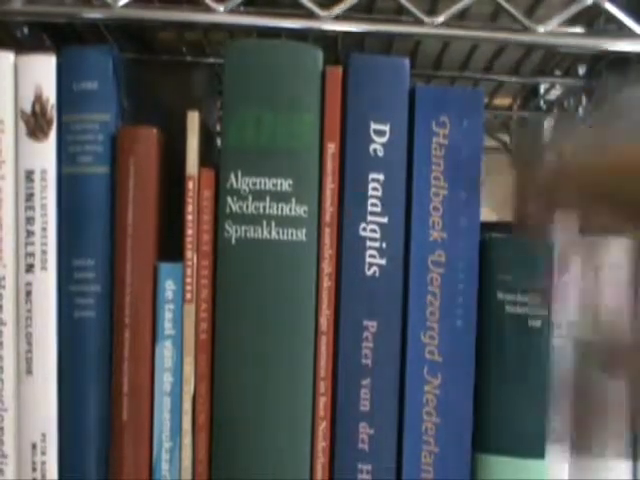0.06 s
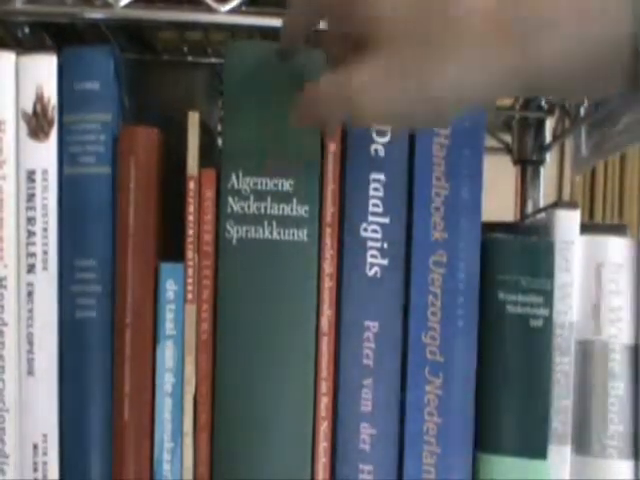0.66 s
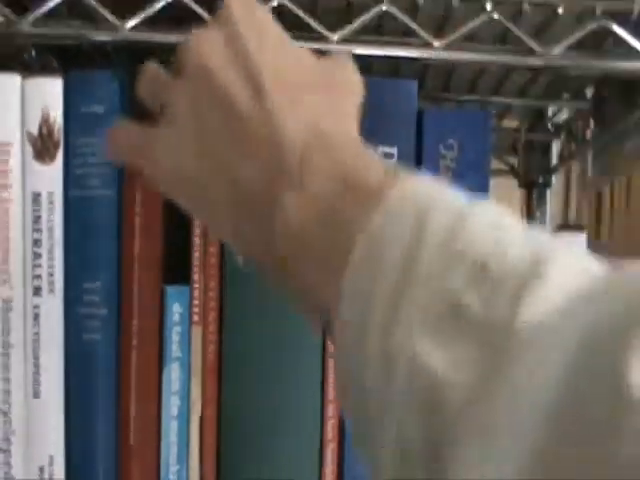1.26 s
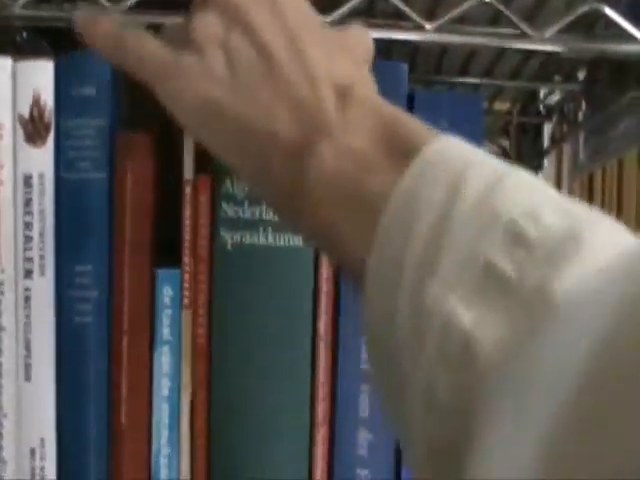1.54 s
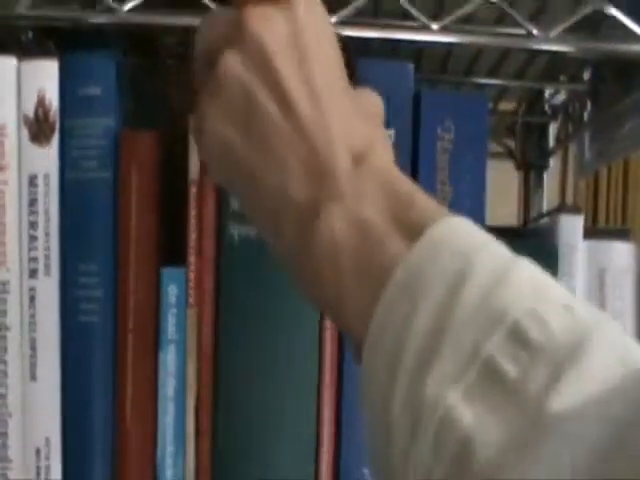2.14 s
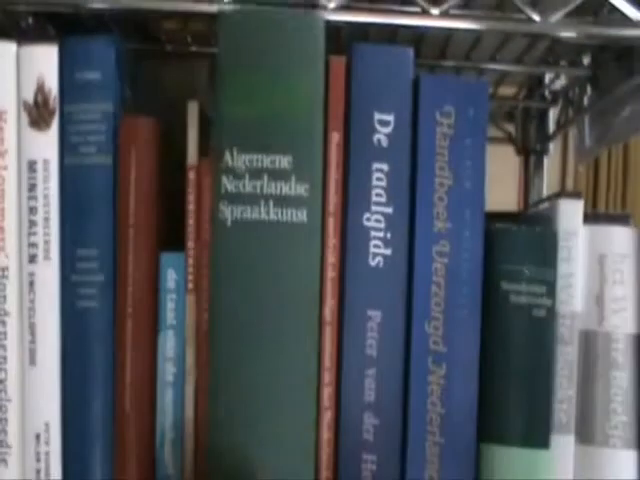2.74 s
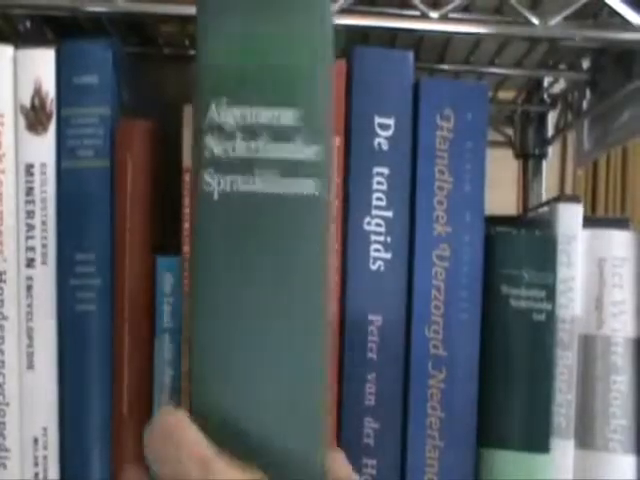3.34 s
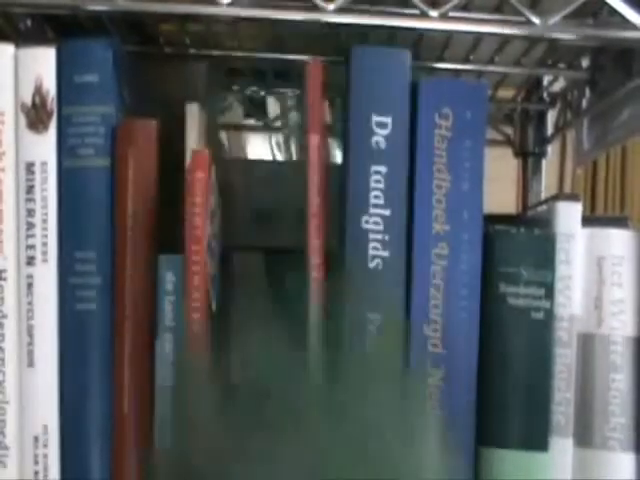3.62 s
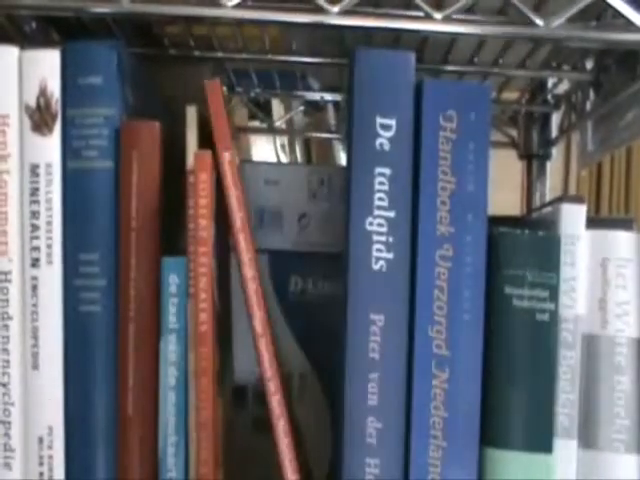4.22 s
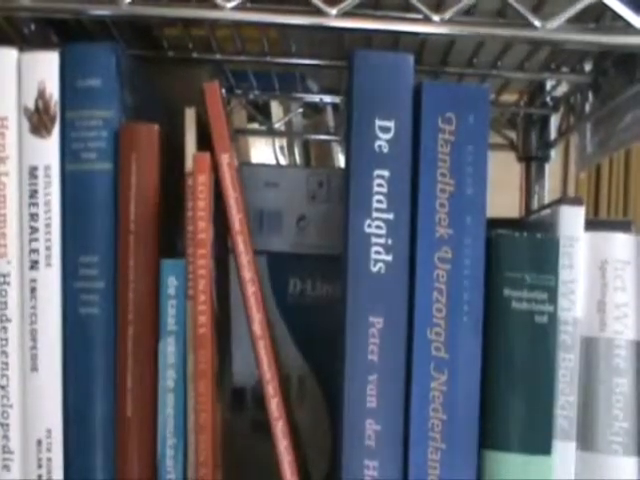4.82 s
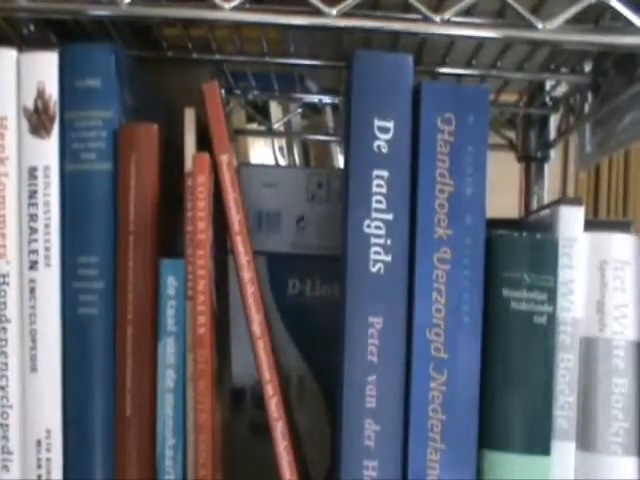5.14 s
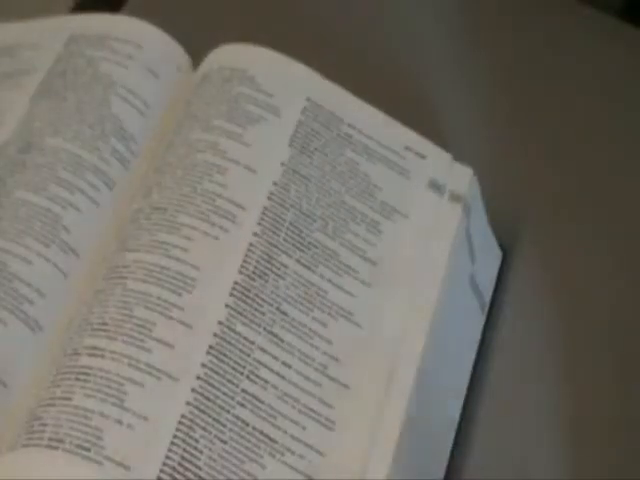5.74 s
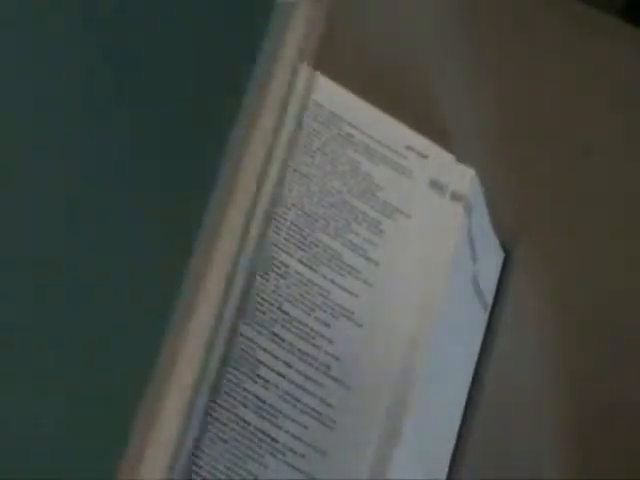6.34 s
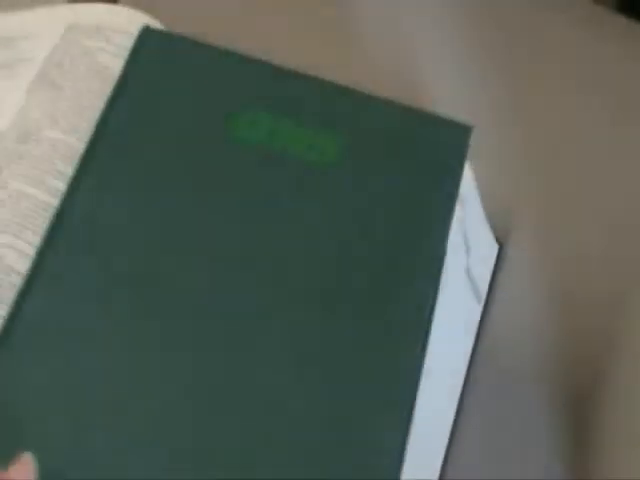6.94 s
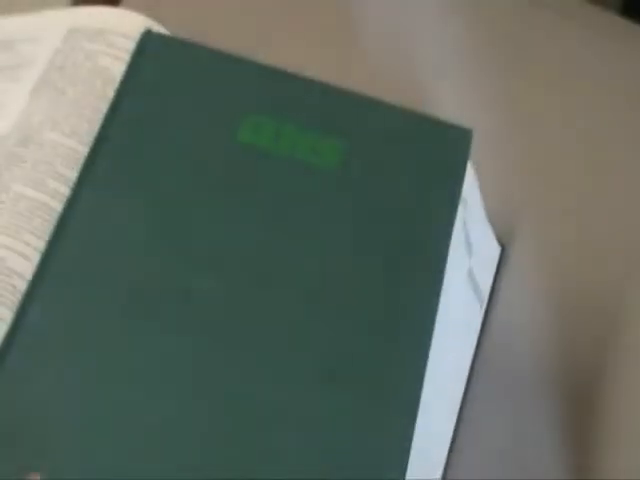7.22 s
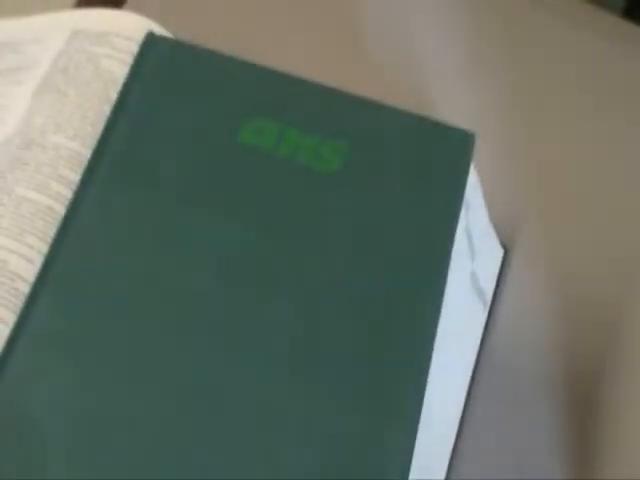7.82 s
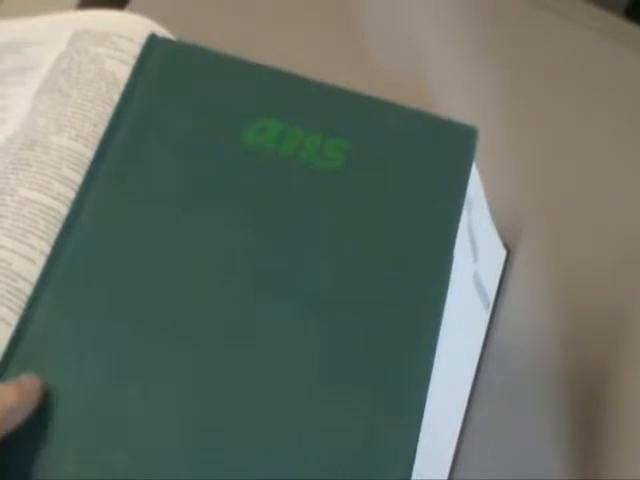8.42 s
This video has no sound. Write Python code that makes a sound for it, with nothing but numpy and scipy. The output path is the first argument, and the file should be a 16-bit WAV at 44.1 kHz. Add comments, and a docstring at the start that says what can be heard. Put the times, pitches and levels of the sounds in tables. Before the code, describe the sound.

A thick book knocks against others and scrapes off a wire shelf, then after a pause is shut with a slap.

```python
"""Hardback pulled from a shelf and shut

A hand works a thick hardback out of a row on a wire shelf: covers knock, a wire clacks, boards slide
and rasp, a thin book topples. After a pause the book, open on a table, is flipped shut with a slap,
pressing air from its pages. Blows are ringing modes plus a noisy crack; rubbing is dense tiny slips.
Heard close by in a small room, over a low drone from outside and microphone hiss."""
import sys
import numpy as np
from scipy import signal
from scipy.fft import rfft, irfft, next_fast_len
from scipy.io import wavfile
from scipy.ndimage import uniform_filter1d

SR = 44100
rng = np.random.default_rng(int(sys.argv[2]) if len(sys.argv) > 2 else 0)


def master(y):
    """Save y as 16-bit WAV."""
    cut = np.clip(np.atleast_2d(y).T, -1, 1)
    pcm = np.round(cut * 32767)  # scale
    wavfile.write(sys.argv[1], SR, pcm.astype(np.int16))


N = 377748
TIME = np.arange(N) / SR
RING_S = TIME[:SR // 2]  # time axis of one blow

# Steady hiss spectrum. Each row: frequency in Hz, relative density in dB.
AIR_SPECTRUM = [(30, 2.5), (120, 1), (230, 5.5), (380, -1.5), (800, 1), (1250, 0), (2000, -1.5),
                (3200, -6.5), (6300, -10.5), (10000, -12.5), (13000, -10.5), (15000, -14)]
# The thick book is tilted, then drawn out. Each row: time in s, relative effort in dB, sheen in dB.
PULL_CURVE = [(2.939, -45, -6), (2.98, -52.5, 6), (3.116, -41, 1.5), (3.27, -53, 4), (3.354, -40, 2),
              (3.39, -56, -3), (3.46, -42, 3), (3.52, -38, 7), (3.59, -37.5, 6.5), (3.635, -43.5, 2),
              (3.65, -41.5, 12.5), (3.68, -45.5, 2), (3.72, -48, 9.5), (3.765, -43.5, 5), (3.82, -67, 1)]


def amp(db):
    """Decibels to gain."""
    return 10 ** (np.asarray(db) / 20)


def unit(x, count=None):
    """Scale the first count samples (or all) to rms 1."""
    return x / np.sqrt(np.mean(x[:count] ** 2) + 1e-18)


def curves(table):
    """Interpolate each column over the times in the first."""
    times_s, *columns = np.transpose(table)
    return [np.interp(TIME, times_s, column) for column in columns]


def colour(x, spectrum):
    """Filter by (Hz, dB) rows; output rms 1."""
    size = next_fast_len(len(x))
    hz, db = np.transpose(spectrum)
    bin_db = np.interp(np.log(np.fft.rfftfreq(size, 1 / SR) + 1), np.log(hz), db)
    return unit(irfft(rfft(x, size) * amp(bin_db), size)[:len(x)])


def band(x, lo_hz, hi_hz):
    """Causal band-pass."""
    sos = signal.butter(3, [lo_hz, min(hi_hz, .48 * SR)], "band", fs=SR, output="sos")
    return signal.sosfilt(sos, x)


def resonate(x, hz, q):
    """One resonance, gain 1 at its centre."""
    return signal.lfilter(*signal.iirpeak(hz, q, fs=SR), x)


def fade(t60_s):
    """Exponential decay."""
    return np.exp(-np.log(1000) * RING_S / max(t60_s, .005))


def envelope(start_s, end_s, attack_s, release_s):
    """Rise from the start, hold until the end, then fall."""
    return np.clip((TIME - start_s) / attack_s, 0, 1) * np.clip(1 - (TIME - end_s) / release_s, 0, 1)


def walk(rate_hz):
    """Smooth random drift, rms 1."""
    steps = rng.standard_normal(N // 100)
    return unit(np.interp(TIME * rate_hz, np.arange(len(steps)), steps))


def add(track, start_s, sound):
    """Mix a sound into a track."""
    start = int(start_s * SR)
    track[start:start + len(sound)] += sound[:N - start]


def tone(hz, db, waver_db, waver_hz):
    """A sine drifting in level and pitch."""
    gain = np.sqrt(2) * amp(db + waver_db * walk(8.6))
    return gain * np.sin(2 * np.pi * np.cumsum(hz + waver_hz * walk(10)) / SR)


def background():
    """Microphone hiss, a low drone from outside and a faint whine in the room."""
    # Each row: time in s, pitch in Hz, level in dB.
    drone_curve = [(4.3, 70.7, -58.5), (4.68, 66, -48), (4.75, 67, -60), (4.99, 69.4, -38.5),
                   (5.15, 68.2, -45.5), (5.42, 69.2, -63), (5.51, 64.0, -47.5), (5.86, 64.05, -49),
                   (8.03, 68.45, -57), (8.55, 68.3, -63)]
    # Each row: pitch in Hz, level in dB.
    whine_tones = [(770, -75.5), (1986, -78)]
    drone = tone(*curves(drone_curve), waver_db=1.2, waver_hz=.8)
    whine = sum(tone(hz, db, waver_db=0, waver_hz=5.54) for hz, db in whine_tones)
    return amp(-57.5) * colour(rng.standard_normal(N), AIR_SPECTRUM) + drone + whine


def shelf_rumble(effort):
    """Over a faint steady rumble the shelf shudders under the moving weight, most during the pull."""
    # Each row: frequency in Hz, relative density in dB.
    rumble_spectrum = [(12, -33), (20, 8.5), (124, -1.5), (172, -9.5), (243, 3), (290, -14), (351, -14),
                       (420, -12), (550, -15), (920, -120)]
    handling = envelope(2.4, 4.22, attack_s=.083, release_s=.083)
    gain = amp(-65.5) + amp(-50.5) * (handling + effort)
    return colour(rng.standard_normal(N), rumble_spectrum) * gain


def friction(rate_hz, spread_db, smooth_db):
    """Fibres catch and slip: dense clicks of uneven size over a smooth rub."""
    slips = (rng.random(N) < rate_hz / SR) * rng.standard_normal(N)
    slips *= amp(spread_db * np.minimum(rng.exponential(size=N), 4))
    return unit(slips) + amp(smooth_db) * rng.standard_normal(N)


def rubbing(effort):
    """Cloth and paper hiss, with a sheen on top, and boards rasp; all three jerk together."""
    # Cloth and paper. Each row: frequency in Hz, relative density in dB.
    hiss_spectrum = [(880, 9), (1500, 6.5), (1870, 8), (2040, -1), (4210, -1), (7500, -4), (11200, -4.5),
                     (13600, -7.5), (15000, -28)]
    # Boards. Same columns.
    rasp_spectrum = [(180, 5.5), (300, 0.5), (642, 1.5), (822, -0.5), (901, 1), (1490, -3), (1870, -23),
                     (2030, -1), (3500, -17), (4550, -63), (7700, -120)]
    jerk = walk(70)
    fine = friction(rate_hz=3000, spread_db=2.8, smooth_db=2)
    coarse = friction(rate_hz=2500, spread_db=2.6, smooth_db=2)
    catching = friction(rate_hz=900, spread_db=2.2, smooth_db=1)
    sheen = band(colour(fine, hiss_spectrum), 7100, SR / 2) * amp(.96 * jerk)
    hiss = band(colour(coarse, hiss_spectrum), 2170, 7600) * amp(1.5 * jerk)
    rasp = colour(catching, rasp_spectrum) * amp(1.4 * jerk)
    return sleeve(hiss + sheen) + strokes(hiss, sheen, rasp) + pull(effort, hiss, sheen, rasp)


def sleeve(rustle):
    """Cloth stirs unevenly while the arm is at the shelf."""
    at_shelf = envelope(-.35, 5.34, attack_s=.27, release_s=.27)
    return rustle * amp(-60.5 + 2.5 * walk(22.26)) * at_shelf


def strokes(hiss, sheen, rasp):
    """Hands and sleeves brush covers and pages; short strokes start and die away sooner."""
    # Each row: start in s, length in s, hiss in dB, rasp in dB, sheen in dB re hiss, swell in dB.
    brushes = [(0, 0.15, -58, -61, -5, -19), (0.31, 0.17, -61, -56.5, 5.5, 0),
               (0.629, 0.2, -48, -52, -4, 8.5), (0.774, 0.013, -47, -47, -6, -11),
               (0.853, 0.29, -55, -62.5, 2.5, 2), (1.196, 0.023, -55, -66, 0, -2),
               (1.283, 0.027, -55.5, -60, 0, 0), (1.356, 0.11, -54.5, -65.5, -0.5, -3),
               (1.487, 0.053, -58, -60, -8, -11), (1.716, 0.19, -58.5, -61, 2.5, 7),
               (2.009, 0.24, -44.5, -52.5, 0, -10), (2.176, 0.015, -38, -37.5, -9, 8),
               (2.227, 0.027, -49, -48, -22, 13), (2.375, 0.23, -47.5, -54.5, -2, 5.5),
               (2.711, 0.082, -38.5, -53, 4.5, -10.5), (2.826, 0.051, -45, -57, 1.5, 21),
               (3.695, 0.09, -46, -68, -6, 5), (3.823, 0.19, -47, -54, -1.5, 2),
               (4.078, 0.17, -47.5, -50, 3, -9), (4.384, 0.19, -47, -62.5, -1, 14.5),
               (4.608, 0.15, -45.5, -60, -3.5, 10), (4.804, 0.11, -49.5, -55.5, -1, 7),
               (4.912, 0.075, -42.5, -46, -1.5, 1), (4.983, 0.087, -58, -59, -3, -7),
               (6.944, 0.042, -40, -43, -11, -3), (7.025, 0.15, -49.5, -59, -2.5, 3),
               (7.621, 0.11, -59, -78, 3.5, -15), (8.466, 0.038, -50, -79, -1, -11)]
    attack_share, release_share = .15, .26
    out = np.zeros(N)
    for start_s, length_s, hiss_db, rasp_db, sheen_db, swell_db in brushes:
        along = (TIME - start_s) / length_s
        push = np.clip(along / attack_share, 0, 1) * amp(swell_db * (np.clip(along, 0, 1) - .5))
        speed = push * np.exp(-np.clip((along - 1) / release_share, 0, 20))
        out += speed * (amp(hiss_db) * (hiss + amp(sheen_db) * sheen) + amp(rasp_db) * rasp)
    return out


def blows(rows, modes, crack_db, focus_db_per_oct, rustle_db, rustle_t60_s, edge_db, contact_s,
          body_db, hollow_db, hollow_q, damping):
    """Each blow rings the modes nearest its pitch most; the contact cracks and the pages rustle on."""
    bands_hz = [(360, 1450), (1450, 4600), (4600, 12000)]  # board, edge, tick
    reference_hz, edge_db_per_oct = 810, 3.5
    onset_samples, snap_s = 350, .00008
    snap = unit(np.exp(-RING_S / snap_s), onset_samples)  # hard edges meeting squarely
    out = np.zeros(N)
    for start_s, level_db, ring_hz, hollow_hz, bright_db, t60_s, snap_db in rows:
        ring = 0
        for mode_hz, mode_db, mode_t60_s in modes:
            detune, polarity = rng.standard_normal(2)
            gain = np.sign(polarity) * amp(mode_db - focus_db_per_oct * abs(np.log2(mode_hz / ring_hz)))
            ring += gain * np.sin(2 * np.pi * mode_hz * (1 + detune / 200) * RING_S) * fade(mode_t60_s)
        ring *= fade(t60_s) ** damping  # a firmly held book rings less
        # surfaces meet at a few high spots, so the crack is spiky
        spikes = rng.standard_normal(len(RING_S)) * amp(3 * rng.standard_normal(len(RING_S)))
        crack = spikes * (fade(t60_s) + amp(rustle_db) * fade(rustle_t60_s))
        # a soft contact is dull and builds force slowly
        hardness = amp(bright_db) * ring_hz / reference_hz
        force = 1 - np.exp(-RING_S * hardness / contact_s)
        hit = (unit(ring, onset_samples) + amp(crack_db) * unit(crack, onset_samples)) * force
        hit += amp(snap_db) * snap
        # the struck board resonates broadly, its overhanging edge narrowly and higher
        body = amp(body_db) * resonate(hit, ring_hz, q=2.15)
        hollow = amp(hollow_db) * resonate(hit, hollow_hz, hollow_q)
        hit += body + hollow
        lift_db = edge_db + edge_db_per_oct * np.log2(ring_hz / reference_hz)
        for band_hz, band_db in zip(bands_hz, [0, bright_db + lift_db, 2 * bright_db]):
            add(out, start_s, amp(level_db + band_db) * unit(band(hit, *band_hz), onset_samples))
    return out


def cover_knocks():
    """Covers and fingers knock, ringing the boards."""
    # Each row: start in s, level in dB, ring pitch in Hz, hollow edge in Hz, brightness in dB per band,
    # crack t60 in s, contact snap in dB.
    knocks = [(.2845, -34, 690, 2700, -8, 0.24, 4.5), (.642, -49, 1200, 3270, -3, 0.031, -4),
              (.683, -53, 696, 2100, -8, 0.055, -15), (.8005, -35, 1790, 1830, -7, .11, -1.5),
              (.8025, -37.5, 600, 1700, -8.5, 0.18, -24), (1.061, -50, 425, 2500, -21, 0.037, -21),
              (1.0995, -29.5, 890, 3200, -2, .018, -1.5), (1.1003, -31.5, 505, 3250, -8, 0.02, -9),
              (1.1945, -47.5, 430, 3240, -10, .03, -7), (1.21, -58, 900, 3200, 1, .05, -15),
              (1.4075, -55, 807, 3000, 1, .018, -5), (2.161, -33.5, 950, 1520, -8.5, 0.15, -23.5),
              (2.19, -34.5, 573, 2170, -4, .082, -7), (2.332, -40, 720, 2790, -5.5, 0.16, -22),
              (2.4055, -31.5, 886, 1580, -7, 0.05, -12), (2.574, -37.5, 920, 2140, -11.5, 0.086, -26),
              (2.6565, -32.5, 1020, 2760, -8, .06, -1), (2.7135, -52, 700, 2500, 2.5, .04, -13),
              (2.944, -45, 840, 4100, -13, .055, -18), (3.089, -38.5, 450, 2500, -14, 0.059, -25),
              (3.1675, -36, 765, 1630, -17, .04, -5.5), (3.2085, -81.5, 1500, 4540, 17, .011, 0),
              (3.329, -31, 970, 1500, -13.5, 0.071, -12), (3.349, -52, 880, 3000, -3, .04, -9.5),
              (3.541, -39, 560, 2500, -15, 0.055, -20), (3.7855, -31.5, 900, 1490, -5, 0.068, -1.5),
              (3.8535, -31, 650, 3080, -14, 0.041, -5), (3.944, -37.5, 716, 3940, -6.5, 0.042, -11),
              (4.041, -44, 520, 3830, -2.5, 0.038, -12), (4.091, -40.5, 508, 3870, -4, 0.13, -20),
              (4.131, -51, 900, 3500, 3.5, 0.022, -10), (4.354, -48.5, 586, 2500, -13, .05, -20),
              (4.461, -50, 714, 2500, -13, 0.12, -20), (4.5975, -37.5, 800, 1840, -2.5, .035, 6),
              (4.606, -47.5, 910, 3000, -2, .02, -10), (4.713, -48, 829, 2500, -22, 0.073, -20),
              (4.753, -38.5, 854, 2480, -8.5, 0.2, -6), (4.819, -46.5, 700, 2500, -23, .077, -18),
              (4.923, -43, 600, 2680, -8, .25, -25), (7.285, -79, 1930, 3500, 13.5, .01, -12),
              (7.726, -70, 1893, 3000, 4, .037, -16)]
    # Each row: frequency in Hz, relative level in dB, t60 in s.
    cover_modes = [(317, 2.5, 0.063), (470, -1.5, 0.03), (677, 2, 0.032), (868, -12, 0.1), (904, 2, 0.018),
                   (1080, 5.5, 0.019), (1245, -5, 0.074), (1580, 12, 0.014), (1850, 1, 0.047),
                   (2110, 17.5, 0.016), (2665, 15.5, 0.028), (3127, 21, 0.019), (4400, -18, .025)]
    return blows(knocks + catches(count=7), cover_modes, crack_db=5, focus_db_per_oct=8,
                 rustle_db=-25, rustle_t60_s=.16, edge_db=4.5, contact_s=.00051,
                 body_db=1.5, hollow_db=3.5, hollow_q=11.4, damping=.24)


def thumps(thud_db=-4, stiffening=.19, rise_s=.0011):
    """A book bounces on its support, which is stiffest while squeezed; the pages add a dull thud."""
    # Each row: start in s, settled pitch in Hz, relative level in dB, t60 in s.
    landings = [(.313, 114, -46.5, 0.18), (.374, 133.5, -45.5, 0.19), (.8005, 130, -30.5, 0.13),
                (.804, 250, -38, 0.11), (1.0996, 263, -41, 0.022), (1.194, 166, -47.5, 0.044),
                (1.94, 286, -53.5, 0.047), (2.163, 202, -46, 0.1), (2.189, 253, -47, .07),
                (2.332, 290, -51, 0.066), (2.406, 150, -46, 0.054), (2.572, 106, -36.5, 0.13),
                (2.574, 245, -48.5, 0.046), (2.943, 110, -45.5, 0.053), (3.087, 116, -34.5, 0.088),
                (3.164, 110, -45, 0.18), (3.329, 294, -48, 0.066), (3.462, 101.4, -50, 0.23),
                (3.52, 140, -39.5, 0.11), (3.786, 327, -41, 0.096), (3.787, 140, -45, .06),
                (4.092, 293, -45, 0.11), (4.187, 142, -41, 0.13), (4.361, 111, -50, 0.092),
                (4.462, 260, -52.5, 0.04), (4.598, 234, -45, .035), (4.608, 102, -38, 0.066),
                (4.716, 243, -49.5, 0.073), (4.759, 111, -39.5, 0.18), (4.821, 260, -45, 0.043),
                (4.922, 47.7, -30.5, 0.29), (4.92, 89, -28.5, 0.1), (4.924, 210, -40.5, .12),
                (4.955, 105, -33.5, .16), (6.92, 166, -35, 0.097), (6.922, 289, -37.5, 0.13),
                (6.924, 121, -33.5, 0.1), (6.93, 68, -50, 0.7), (6.955, 201, -41.5, 0.33),
                (8.467, 125, -56.5, .14)]
    push = 1 - np.exp(-RING_S / rise_s)
    out = np.zeros(N)
    for start_s, hz, db, t60_s in landings:
        glide_hz = hz * (1 + stiffening * fade(t60_s / 2))
        swing = np.sin(2 * np.pi * np.cumsum(glide_hz) / SR)
        thud = unit(band(rng.standard_normal(len(RING_S)), hz / 2, hz * 2), count=1800)
        bounce = band((swing + amp(thud_db) * thud) * push * fade(t60_s), hz / 2, hz * 4)
        add(out, start_s, amp(db) * unit(bounce, count=900))
    return out


def hum(flutter_db=3, waver_hz=.725):
    """A faint rough hum comes and goes: overtones of one low pitch, each fluttering on its own."""
    # Each row: time in s, fundamental in Hz, level in dB.
    hum_curve = [(.9, 76.6, -74), (1.5, 77.8, -61), (2.2, 80.67, -57.5), (2.9, 81.6, -59),
                 (3.8, 81.56, -52), (4.3, 79, -62), (5.2, 82.6, -63)]
    # Each row: harmonic number, relative level in dB.
    harmonics = [(2, -8), (3, 1.5), (4, -7), (5, -12)]
    hz, level_db = curves(hum_curve)
    phase = 2 * np.pi * np.cumsum(hz + waver_hz * walk(25.28)) / SR
    overtones = sum(amp(db + flutter_db * walk(35)) * np.sin(k * phase) for k, db in harmonics)
    gate = envelope(hum_curve[0][0], hum_curve[-1][0], attack_s=.27, release_s=.27)
    return amp(level_db) * overtones * gate


def wire_clack(start_s=2.1896, rise_s=.00082):
    """A cover snaps past a shelf wire: the wire rings under the short crack of the board."""
    # Each row: frequency in Hz, relative level in dB, t60 in s.
    wire_modes = [(567, -12, .05), (1028, -13, .06), (2191, -5, .035), (2376, -3, .055), (2830, -2, .045),
                  (3353, 0, .04), (4176, 0, .035), (4438, -1, .035), (4741, 1, .035), (5280, -5, .04),
                  (7379, -7, .045), (8534, -5, .045), (9124, -6, .045), (9830, -8, .04)]
    # Each row: frequency in Hz, relative density in dB.
    crack_spectrum = [(250, -13), (550, 0), (1400, -9), (2100, 5), (4600, 3.5), (6300, 0.5), (7900, -6),
                      (9300, 4), (11000, -1.5), (14000, -13)]
    ring = sum(amp(db) * np.sin(2 * np.pi * (hz * RING_S + rng.random())) * fade(t60_s)
               for hz, db, t60_s in wire_modes)
    crack = colour(rng.standard_normal(len(RING_S)), crack_spectrum) * fade(t60_s=.054)
    force = 1 - np.exp(-RING_S / rise_s)
    out = np.zeros(N)
    add(out, start_s, amp(-19) * unit(ring * force, count=350))
    add(out, start_s, amp(-20.5) * unit(crack * force, count=350))
    return out


def pull_effort(ramp_s=.036):
    """How hard the thick book slides, 0 to 1."""
    db, _ = curves(PULL_CURVE)
    return amp(db - db.max()) * envelope(PULL_CURVE[0][0], PULL_CURVE[-1][0] - ramp_s, ramp_s, ramp_s)


def pull(effort, hiss, sheen, rasp, free_s=3.65):
    """Wedged boards rasp more than in proportion to effort; once they are free, only pages brush."""
    _, sheen_db = curves(PULL_CURVE)
    wedged = envelope(PULL_CURVE[0][0], free_s, attack_s=.036, release_s=.069)
    pages = amp(-36.5) * effort * (hiss + amp(sheen_db) * sheen)
    boards = amp(-42.5) * wedged * effort ** 1.33 * rasp
    return pages + boards


def catches(count, start_s=3.44, end_s=3.66):
    """Boards catch on their neighbours as the book runs out: rows of dull random knocks."""
    hollow_hz, bright_db, t60_s, snap_db = 2500, -15, .07, -20
    rows = []
    for k, (delay, size, pitch) in enumerate(rng.random((count, 3))):
        time_s = start_s + (k + delay) / count * (end_s - start_s)
        level_db = -44.5 + 5 * (2 * size - 1)
        ring_hz = 560 * 2 ** (pitch - .5)
        rows.append((time_s, level_db, ring_hz, hollow_hz, bright_db, t60_s, snap_db))
    return rows


def closing_slap():
    """The closing half lands in a quick riffle, pages first and board last, ringing the table."""
    # Each row: start in s, level in dB, ring pitch in Hz, hollow edge in Hz, brightness in dB per band,
    # crack t60 in s, contact snap in dB.
    slaps = [(6.9135, -34, 850, 2000, -9.5, .069, -24), (6.9208, -24.5, 603, 2450, -6, .028, 0),
             (6.9238, -32, 1100, 1970, -5, .025, -7), (6.9292, -29, 1250, 1700, -3, .024, -10),
             (6.9315, -28.5, 1620, 1720, -6.5, 0.022, -5)]
    # Each row: frequency in Hz, relative level in dB, t60 in s.
    table_modes = [(450, -6, .05), (570, -4, .04), (615, -4, .04), (745, -7, .035), (850, -9, .035),
                   (1050, -5, .05), (1308, -5, .04), (1590, -3, .025), (1690, 1, .03), (1745, -1, .035),
                   (1945, -4, .04), (2250, -4, .03), (2450, -3, .03), (2900, -9, .03)]
    return blows(slaps, table_modes, crack_db=1, focus_db_per_oct=2.5,
                 rustle_db=-11.5, rustle_t60_s=.3, edge_db=5.5, contact_s=.00018,
                 body_db=6, hollow_db=3, hollow_q=8, damping=.056)


def wall_echo(x, delay_s, db):
    """First bounce off a nearby surface."""
    return amp(db) * np.pad(x, (int(delay_s * SR), 0))[:N]


def room_reverb(x, build_s=.0013):
    """Diffuse echoes in octave bands, drawn anew on each call; the lows stay longest."""
    # Each row: frequency in Hz, t60 in s.
    room_decay = [(70, 0.3), (160, 0.61), (420, 0.44), (1100, 0.19), (3000, 0.17), (10000, 0.16)]
    hz, t60_s = np.transpose(room_decay)
    tail = 0
    for centre_hz in 62.5 * 2 ** np.arange(9):
        noise = band(rng.standard_normal(len(RING_S)), centre_hz / np.sqrt(2), centre_hz * np.sqrt(2))
        tail += noise * fade(np.interp(np.log(centre_hz), np.log(hz), t60_s))
    tail *= 1 - np.exp(-RING_S / build_s)
    return signal.fftconvolve(x, tail / np.linalg.norm(tail))[:N]


def stereo_side(near):
    """Near surfaces, the room and the hiss give a little width, mostly above the bass."""
    scatter = unit(rng.standard_normal(200)) / np.sqrt(200)
    side = amp(-23) * room_reverb(near) + amp(-12.5) * signal.fftconvolve(near, scatter)[:N]
    side += amp(-6.5) * band(room_reverb(near), 6300, 12900)
    side += amp(-56.5) * colour(rng.standard_normal(N), AIR_SPECTRUM)
    return band(side, 360, 8500) + amp(-16.5) * band(side, 20, 230)


def scene():
    """Books close in front, the room around them; left and right."""
    hits = cover_knocks() + wire_clack() + closing_slap()
    hits += wall_echo(hits, delay_s=.0079, db=-34)
    effort = pull_effort()
    near = hits + amp(1.5) * thumps() + rubbing(effort) + shelf_rumble(effort)
    mid = near + amp(-12) * room_reverb(near) + background() + hum()
    side = stereo_side(near)
    return np.array([mid + side, mid - side])


def record(dry):
    """The level dips briefly between shelf and table; the top treble is cut."""
    dip_start_s, dip_end_s, dip_db = 5.428, 5.472, -22.5
    top_hz = 15100
    gate = uniform_filter1d(1. * ((TIME < dip_start_s) | (TIME > dip_end_s)), size=200)
    lowpass = signal.ellip(10, .2, 70, top_hz, fs=SR, output="sos")
    return signal.sosfilt(lowpass, dry * np.maximum(gate, amp(dip_db)))


dry = scene()
out = record(dry)
master(out)
```